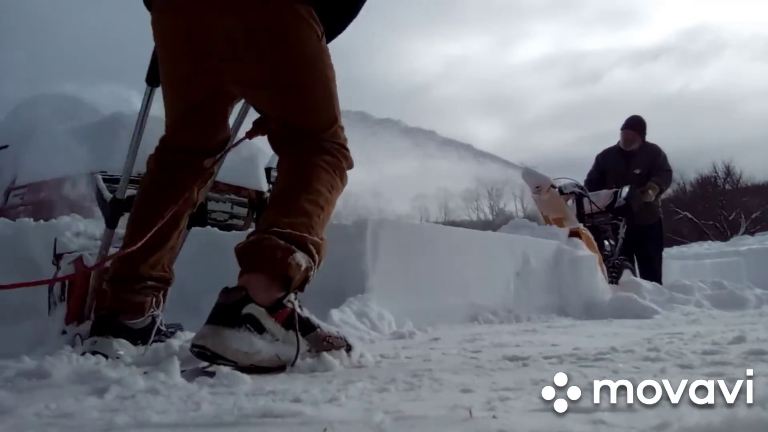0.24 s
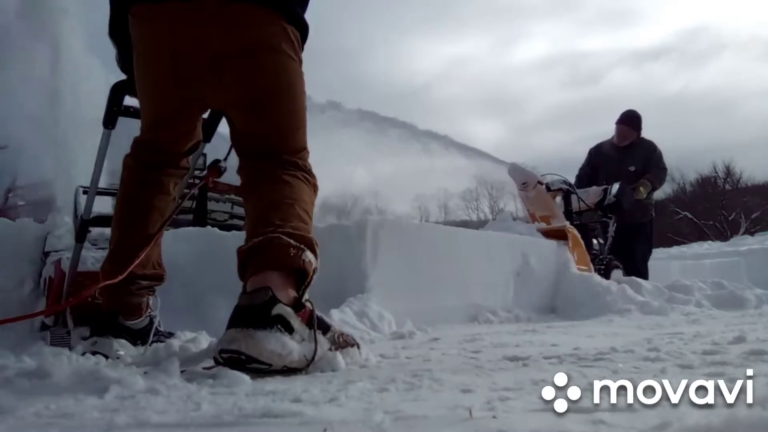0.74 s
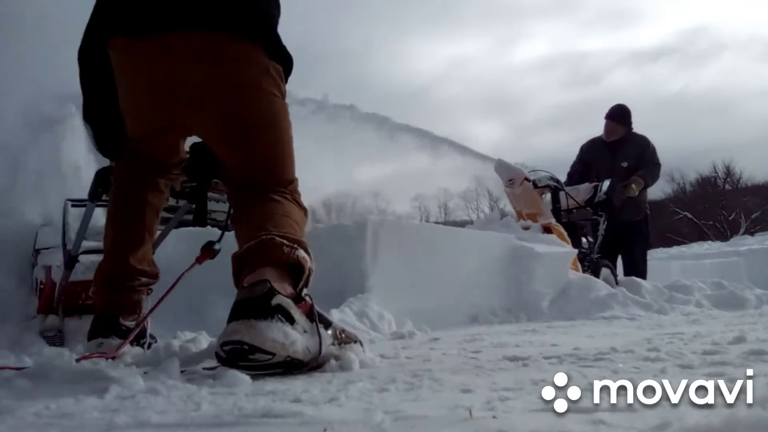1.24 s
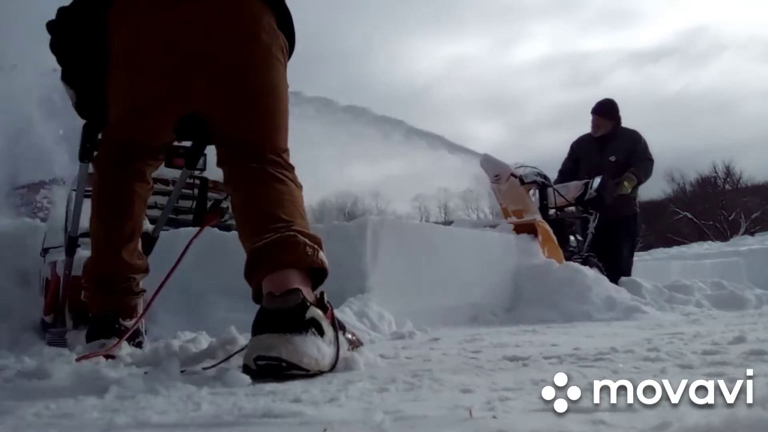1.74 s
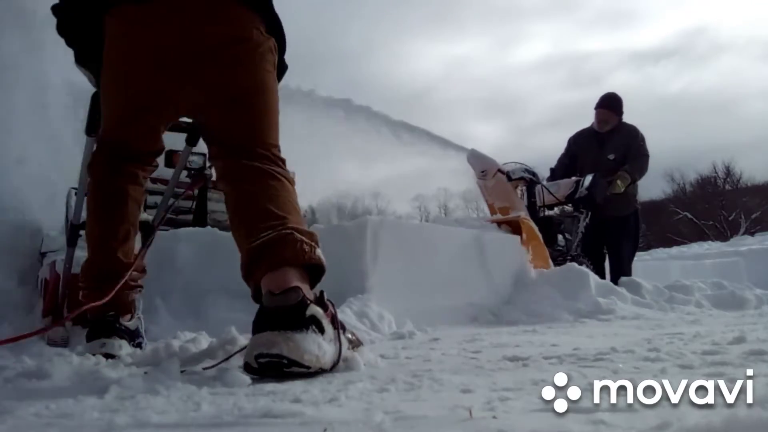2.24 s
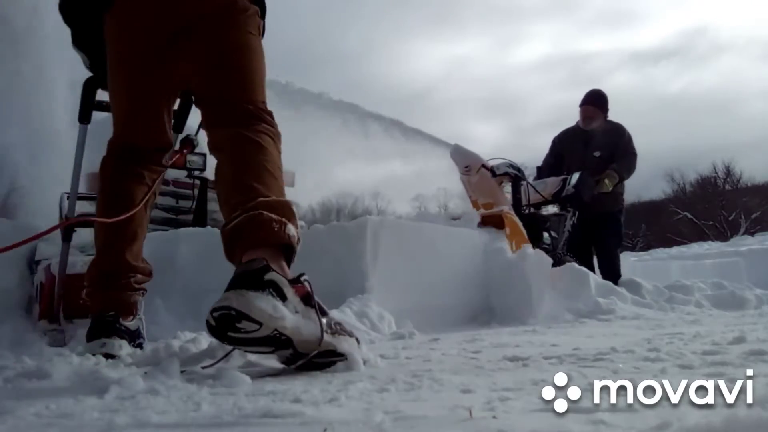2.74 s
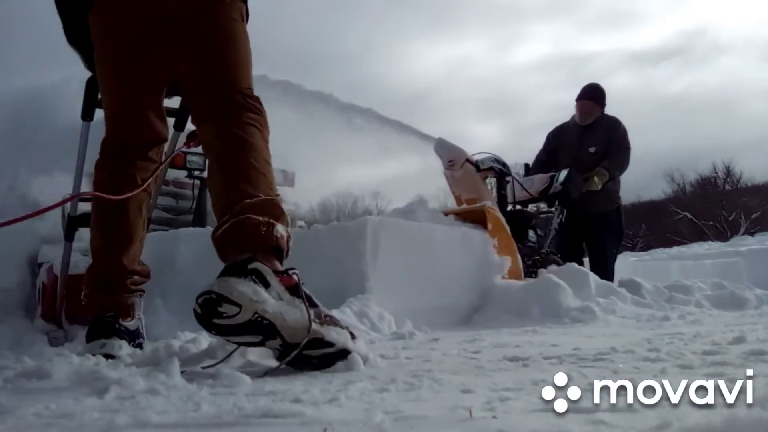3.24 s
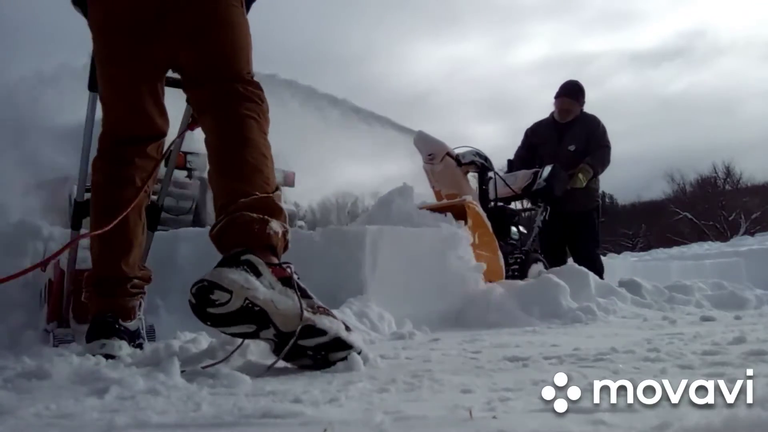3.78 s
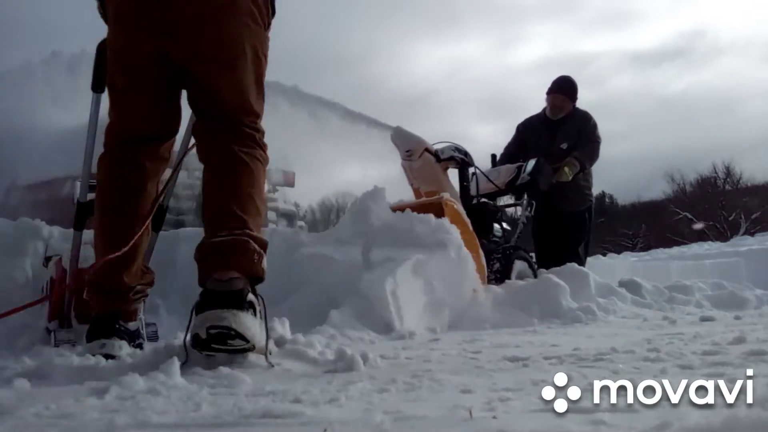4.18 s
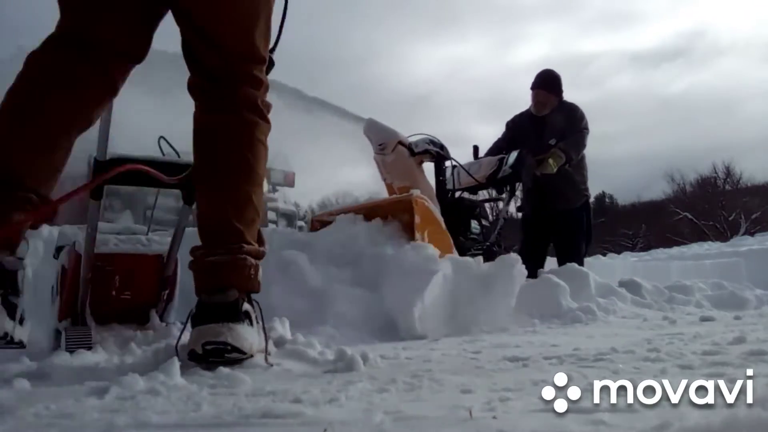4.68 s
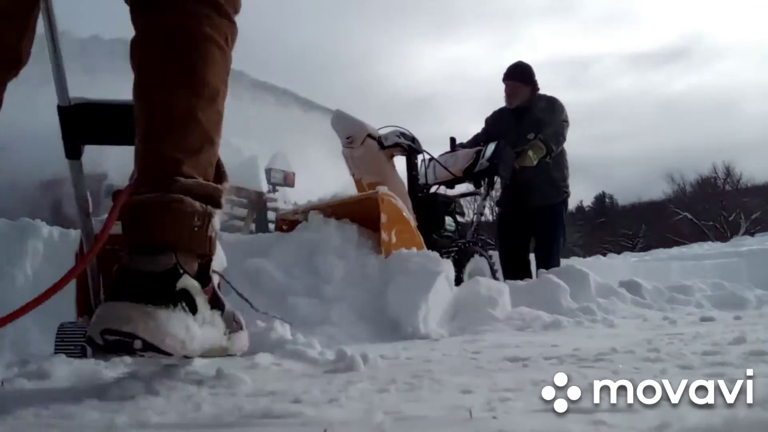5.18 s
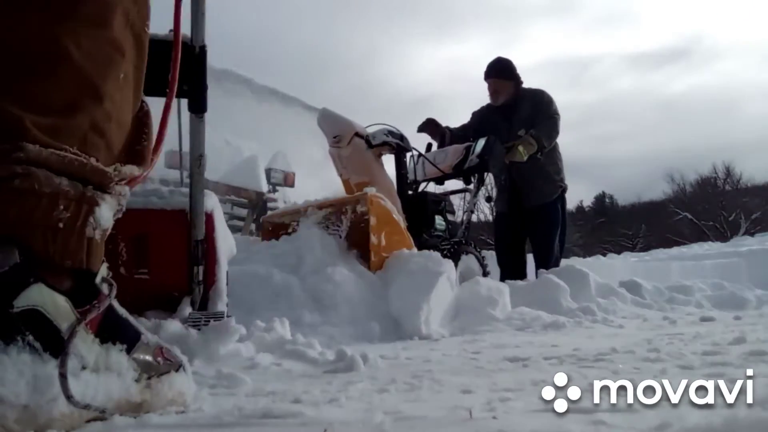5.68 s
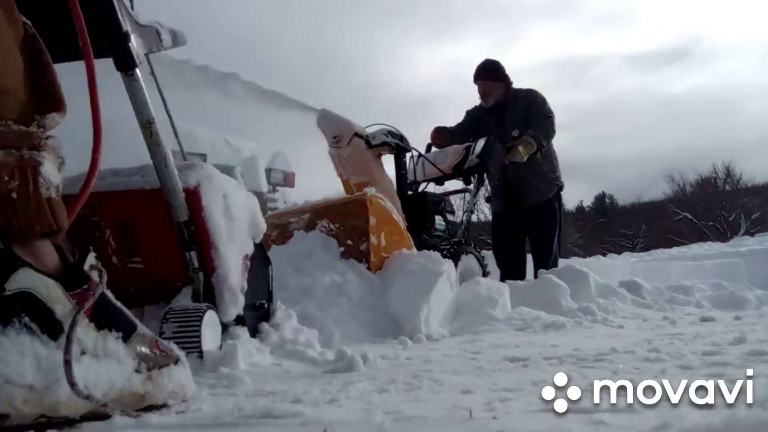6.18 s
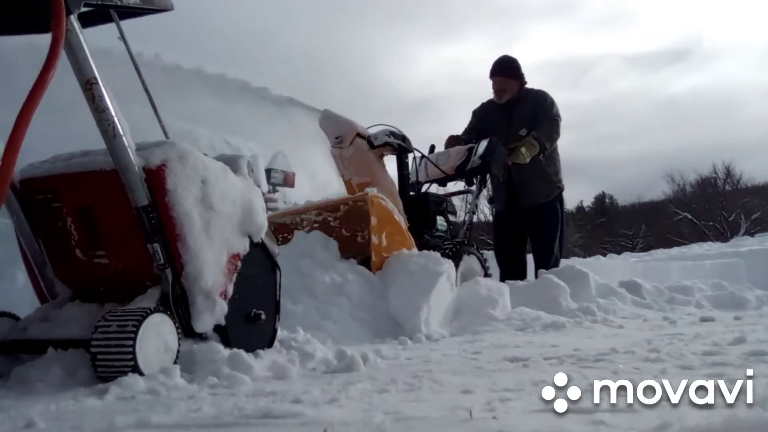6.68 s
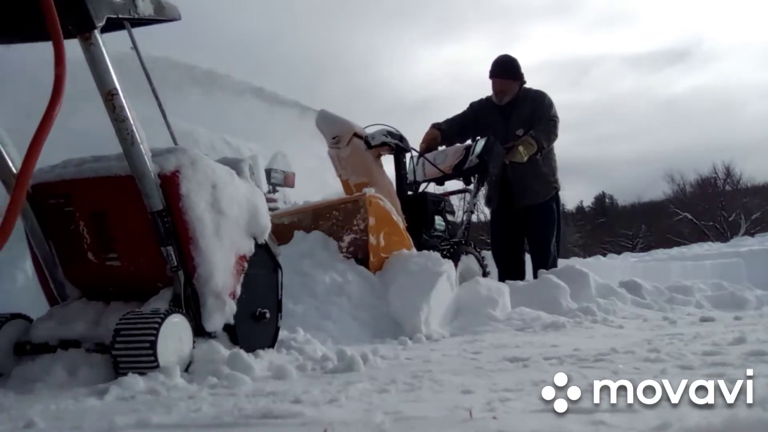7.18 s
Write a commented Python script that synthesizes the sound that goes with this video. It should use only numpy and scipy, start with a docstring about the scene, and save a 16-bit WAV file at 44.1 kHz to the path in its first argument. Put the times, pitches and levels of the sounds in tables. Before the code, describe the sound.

Continuous machine noise in open air: fast booming engine pulses with gritty exhaust rasp, a broad mechanical rush, and a second, quicker paddle thump close to the microphone. Snow rumbles and hisses in irregular bites. The engine grows closer and louder, then its load eases: the thumping blower disappears, the rasp softens, a faint gear whine emerges with the fuller hum, before one last bite of snow.

```python
"""Open air, deep snow: two snowblowers work side by side. A single-cylinder petrol machine creeps closer, each
firing a muffler boom with a rasp of gas; as its load eases it speeds up and hums deeper. Beside the microphone
an electric blower thumps, its paddles slapping snow, until it is pulled back. The petrol machine's augers churn
snow in swelling bites, run empty, then churn again at the end, with powder hissing from the chute."""
import sys
import numpy as np
from scipy import signal
from scipy.fft import rfft, irfft, next_fast_len
from scipy.io import wavfile
from scipy.ndimage import map_coordinates

SR = 44100
rng = np.random.default_rng(int(sys.argv[2]) if len(sys.argv) > 2 else 0)


def master_out(mix):
    """Clip the mix to full scale and print it as 16-bit PCM to the path in sys.argv[1]."""
    frames = np.transpose(np.atleast_2d(mix))
    ceiling = np.clip(frames, -1, 1)
    pcm = np.round(ceiling * 32767).astype(np.int16)
    wavfile.write(sys.argv[1], SR, pcm)


N = 327222
T = np.arange(N) / SR  # s

# petrol engine speed: start_s, firings_per_s
FIRING_RATES = [(0.0, 26.435), (1.0, 26.405), (2.0, 26.392), (3.0, 26.443), (4.0, 26.462), (4.6, 26.623),
                (5.1, 26.605), (5.4, 26.811), (5.65, 27.457), (5.9, 28.231), (6.1, 27.961), (6.3, 27.723),
                (6.6, 28.154), (6.9, 28.645), (7.15, 28.632), (7.42, 28.452)]


def from_db(db):
    """Decibels to amplitude gain."""
    return 10 ** (np.asarray(db) / 20)


def rms_one(x):
    """Scale to unit power."""
    return x / np.sqrt(np.mean(x ** 2) + 1e-20)


def in_time(rows):
    """Interpolate each column of a time curve at every sample."""
    s, *columns = np.transpose(rows)
    return [np.interp(T, s, column) for column in columns]


def ramp(x, start, length):
    """0 before the start, rising linearly to 1 over the length."""
    return np.clip((x - start) / length, 0, 1)


def noise(spectrum):
    """Unit-power noise shaped in frequency, rolled off below the first point."""
    hz, db = np.transpose(spectrum)
    size = next_fast_len(N)
    f = np.maximum(np.arange(size // 2 + 1) * SR / size, 1)
    gain = from_db(np.interp(np.log(f), np.log(hz), db))
    gain = gain * np.minimum(f / hz[0], 1) ** 2
    white = rng.standard_normal(size)
    return rms_one(irfft(rfft(white) * gain, size)[:N])


def narrow_noise(hz, width_hz):
    """Unit-power noise in one narrow resonance, 3 dB down at half a width either side."""
    return noise([
        (hz - 2 * width_hz, -40), (hz - width_hz / 2, -3), (hz, 0),
        (hz + width_hz / 2, -3), (hz + 2 * width_hz, -40), (SR / 2, -80),
    ])


def each_cycle(turns):
    """Random value held per cycle, gliding to the next in the last tenth."""
    values = rng.standard_normal(size=1024)
    whole = np.floor(turns)
    glide = np.clip((turns - whole - .9) * 10, 0, 1)
    return np.interp(whole + glide + 2, np.arange(len(values)), values)


def ringing(orders, turns, late_cycles=0, late_multiple=15):
    """One blow per cycle rings a body: a unit-power waveform with set levels of the rate's multiples."""
    size = 2048  # samples per cycle
    multiple, db = np.transpose(orders)
    k = np.arange(size // 2 + 1)
    level = np.interp(k, multiple, db)
    level = level - 40 * np.log10(np.maximum(k / multiple[-1], 1))
    level[0] = -50
    # minimum phase: the blow comes first, the ring follows
    cepstrum = irfft(np.log(from_db(level)))
    causal = 2 * cepstrum * (np.arange(size) < size // 2)
    lines = np.exp(rfft(causal)) * (k > 0)
    # multiples around late_multiple ring later
    delay_cycles = late_cycles * np.exp(-((k - late_multiple) / 3) ** 2)
    lines = lines * np.exp(-2j * np.pi * np.cumsum(delay_cycles))
    cycle = rms_one(irfft(lines))
    return np.interp(turns % 1 * size, np.arange(size), cycle, period=size)


def reflected(x, lag_ms, strength):
    """Direct sound plus one close reflection; the sum is comb-filtered."""
    late_sample = np.maximum(np.arange(N) - SR * lag_ms / 1000, 0)
    return x + strength * map_coordinates(x, [late_sample], order=3)


def nearness():
    """How near the petrol machine is, 0-1."""
    # approach, easing back slightly at the end: start_s, nearness_0_1
    approach = [(0, 0.06), (1.7, 0.18), (2.7, 0.39), (3.6, 0.54), (4.4, 0.64), (5, 0.75), (5.55, 1),
                (7.42, 0.92)]
    return in_time(approach)[0]


def throttle(wide_open_rate=26.8, closing_span=1.83):
    """Governor closes the throttle as firings per s rise; 1 is wide open."""
    return 1 - ramp(in_time(FIRING_RATES)[0], wide_open_rate, closing_span)


def load(throttle_power=2.04):
    """Engine load, 0-1, falling with a power of the throttle."""
    return throttle() ** throttle_power


def level_db(effort, far_db, near_db, free_db):
    """Engine layer level: far and loaded, plus the changes up close and running free."""
    return far_db + near_db * nearness() + free_db * (1 - effort)


def bites_db():
    """Augers bite into thicker snow: raised-cosine swells."""
    # bites: middle_s, length_s, swell_db
    bites = [(0.272, 1.1, 3), (1.15, .45, 2.5), (1.87, 0.33, 3.5), (3.25, 0.67, 3.5), (3.934, 1.34, 3),
             (5.65, 0.98, 0.5), (7.334, 0.44, 6.5)]
    total_db = 0
    for middle_s, length_s, swell_db in bites:
        phase = np.pi * np.clip((T - middle_s) / length_s, -.5, .5)
        total_db = total_db + swell_db * np.cos(phase) ** 2
    return total_db


def spray(base_db=-47, near_db=-1.5):
    """Powder hisses out of the chute as shaped noise, louder with each bite."""
    # chute hiss spectrum: frequency_hz, density_db_per_hz
    spray_spectrum = [(1500, -25), (3000, -23), (3800, -1.5), (5200, 3.5), (6900, 2.5), (7800, -11),
                      (9000, -21.5), (12300, -25), (13500, -28), (16000, -29)]
    return from_db(base_db + near_db * nearness() + bites_db()) * noise(spray_spectrum)


def churn(base_db=-30, near_db=-3, empty_db=-12, lumps_per_s=30, lumpy_db=0.9):
    """Snow rumbles through the augers in lumps, louder at each bite, hushed while they run empty."""
    # auger rumble spectrum: frequency_hz, density_db_per_hz
    snow_spectrum = [(50, -31), (90, -37), (150, -10.5), (240, 1), (330, -2.5), (430, -8.5), (560, -16),
                     (900, -36), (1600, -56), (4000, -50)]
    emptying = ramp(T, start=5.43, length=1.5)  # s
    refilling = ramp(T, start=6.74, length=0.35)  # s
    churn_db = base_db + near_db * nearness() + bites_db() + empty_db * (emptying - refilling)
    lumps_db = lumpy_db * each_cycle(lumps_per_s * T)
    return from_db(churn_db + lumps_db) * noise(snow_spectrum)


def electric_blower(base_db=-27.5, pulled_back_s=5.6, fade_db_per_s=60, uneven_db=1.5):
    """Each paddle slaps a different lump of snow through the housing: a ring of uneven strength per stroke."""
    # paddle speed: start_s, strokes_per_s
    stroke_rates = [(0.0, 47.58), (3.9, 47.58), (4.3, 47.91), (5.2, 47.98)]
    # paddle thump: multiple_of_stroke_rate, level_db
    thump_orders = [(1, -10), (2, -4), (3, 0), (4, -3), (5, -17), (6, -7), (7, -9), (8, -16), (9, -19),
                    (10, -32), (14, -38)]
    turns = np.cumsum(in_time(stroke_rates)[0]) / SR - .34
    thump_db = base_db - fade_db_per_s * np.maximum(T - pulled_back_s, 0)
    return from_db(thump_db + uneven_db * each_cycle(turns)) * ringing(thump_orders, turns)


def machinery(turns, throb_db=2.0, bite_share=0.81, teeth_per_cycle=48):
    """Fan, belts and gears: a throbbing rush, a whine of meshing teeth and thin ringing metal."""
    # rush spectrum: frequency_hz, density_db_per_hz
    rush_spectrum = [(40, -23.5), (120, 8), (400, 0.5), (620, -0.5), (760, -2), (860, 2), (1050, -3),
                     (1400, -6.5), (1800, -11.5), (2500, -19), (3100, -15), (4000, -24), (8000, -59)]
    # metallic singing: pitch_hz, width_hz, running_free_db, change_under_load_db
    singing_modes = [(3060, 150, -69, 6), (6920, 110, -62, -12)]
    effort = load()
    rush_db = level_db(effort, far_db=-33, near_db=-3.5, free_db=1.1) + bite_share * bites_db()
    rush = from_db(rush_db + throb_db * np.cos(2 * np.pi * turns)) * noise(rush_spectrum)
    # tooth phase (rad) and level (dB) vary from cycle to cycle
    teeth = np.sqrt(2) * np.sin(2 * np.pi * teeth_per_cycle * turns + 0.89 * each_cycle(turns))
    whine_db = level_db(effort, far_db=-76, near_db=3, free_db=24.5) + 1.9 * each_cycle(turns)
    whine = from_db(whine_db) * teeth
    singing = 0
    for pitch_hz, width_hz, free_db, load_db in singing_modes:
        singing = singing + from_db(free_db + load_db * effort) * narrow_noise(pitch_hz, width_hz)
    return rush + whine + singing


def exhaust_gas(turns, rasp_depth=0.99, free_depth=0.5, uneven_db=1.5, eddies_per_s=700, eddy_db=3.0):
    """Gas tears out as the valve opens: a rasp from the can and a sharp hiss at the outlet."""
    # flow after the exhaust valve opens: share_of_cycle, flow_db
    blowdown = [(0, -7.5), (.055, 7.5), (.1, 5.5), (.16, -5), (.24, -4), (.33, -12), (.72, -27.5),
                (.85, -18), (.93, -28), (1, 1.5)]
    # can rasp spectrum: frequency_hz, density_db_per_hz
    rasp_spectrum = [(70, 11.5), (150, 13), (300, -14.5), (550, -2), (750, 0.5), (880, -0.5), (1100, -8.5),
                     (1400, -5), (2000, -6.5), (2600, -8), (3050, -5.5), (3600, -10.5), (4500, -7),
                     (8000, -18), (13000, -25.5)]
    # outlet hiss spectrum: frequency_hz, density_db_per_hz
    hiss_spectrum = [(1500, -18), (3000, -19), (4500, -6), (6000, 3.5), (7000, 7), (7800, -1.5),
                     (9000, -9.5), (11000, -23), (13500, -20.5), (15400, -5), (16000, -6.5)]
    effort = load()
    rasp_db = level_db(throttle(), far_db=-41.5, near_db=11, free_db=-11)
    # up close the outlet points past the microphone
    off_axis_db = -6.5 * ramp(nearness(), start=0.58, length=0.7 - 0.58)
    hiss_db = level_db(effort, far_db=-38.5, near_db=5.5, free_db=-8) + off_axis_db
    # puffs soften as the load falls
    flow_db = np.interp(turns % 1, *np.transpose(blowdown))
    flow_db = flow_db * (free_depth + (1 - free_depth) * effort)
    flow_db = flow_db + uneven_db * each_cycle(turns)
    # the jet breaks up into eddies within each puff
    eddies = np.interp(T * eddies_per_s, np.arange(N), rng.standard_normal(N))
    rasp = rms_one(from_db(rasp_depth * flow_db) * noise(rasp_spectrum))
    hiss = rms_one(from_db(flow_db + eddy_db * eddies) * noise(hiss_spectrum))
    return from_db(rasp_db) * rasp + from_db(hiss_db) * hiss


def muffler(turns, uneven_db=0.35, loaded_lag_cycles=0.019, free_lag_cycles=0.013, bark_hz=185, free_ring_db=-3):
    """Each firing rings muffler and shroud; loaded and free tones crossfade as the load comes off."""
    # muffler tone under load: multiple_of_firing_rate, level_db
    loaded_orders = [(1, -31.5), (2, -11.5), (3, -9.5), (4, -10.5), (5, 0), (6, -2), (7, -11.5), (8, -9.5),
                     (9, -7.5), (10, -13), (11, -12.5), (12, -12.5), (13, -20.5), (14, -13), (15, -6.5),
                     (16, -13.5), (17, -12), (18, -16.5), (19, -31), (20, -16.5), (21, -23.5), (22, -26)]
    # muffler tone running free: multiple_of_firing_rate, level_db
    free_orders = [(1, -34), (2, -12.5), (3, -15), (4, -3), (5, 4.5), (6, 0), (7, -14.5), (8, -6), (9, -7),
                   (10, -15.5), (11, -28), (12, -9.5), (13, -10.5), (14, -20), (15, -13), (16, -15.5),
                   (17, -21.5), (18, -14), (19, -15.5), (20, -20.5), (21, -22.5), (22, -17.5)]
    # upper ring of the engine shroud: frequency_hz, level_db
    shroud = [(660, -29.5), (770, -38.5), (830, -31), (880, -19), (900, -25.5), (925, -19.5), (955, -27.5),
              (1010, -33), (1060, -26), (1170, -31), (1400, -33), (1650, -50)]
    effort = load()
    # shroud pitches placed for the first (loaded) and last (free) firing rates
    first_rate, last_rate = FIRING_RATES[0][1], FIRING_RATES[-1][1]
    loaded_ring = [(hz / first_rate, db) for hz, db in shroud]
    free_ring = [(hz / last_rate, db + free_ring_db) for hz, db in shroud]
    loaded = ringing(list(loaded_orders) + loaded_ring, turns - loaded_lag_cycles, late_cycles=0.554)
    free = ringing(list(free_orders) + free_ring, turns - free_lag_cycles)
    boom_db = level_db(effort, far_db=-23, near_db=4, free_db=2) + uneven_db * each_cycle(turns)
    boom = from_db(boom_db) * (effort * loaded + (1 - effort) * free)
    # the upper multiples make the bark
    upper = signal.sosfiltfilt(signal.butter(2, bark_hz, "high", fs=SR, output="sos"), boom)
    bark_db = level_db(effort, far_db=-1.6, near_db=-1.1, free_db=.5)
    return boom + (from_db(bark_db) - 1) * upper


def scene(echo=0.48, far_lag_ms=0.19, near_lag_ms=0.045):
    """Both machines in open air; the petrol machine's hiss also bounces off the packed snow."""
    turns = np.cumsum(in_time(FIRING_RATES)[0]) / SR + .02
    hiss = exhaust_gas(turns) + machinery(turns) + spray()
    lag_ms = far_lag_ms + (near_lag_ms - far_lag_ms) * nearness()
    petrol = muffler(turns) + reflected(hiss, lag_ms, echo) / np.sqrt(2)
    return (petrol + electric_blower() + churn())[None]


def record(dry, low_cut_hz=34, ceiling=.42, cutoff_hz=15800):
    """Cut the deepest rumble, round the tallest peaks, cut the top of the treble."""
    low_cut = signal.butter(4, low_cut_hz, "high", fs=SR, output="sos")
    heard = signal.sosfiltfilt(low_cut, dry)
    rounded = heard / (1 + (heard / ceiling) ** 4) ** (1 / 4)
    treble_cut = signal.ellip(10, .2, 80, cutoff_hz, fs=SR, output="sos")
    return signal.sosfilt(treble_cut, rounded)


dry = scene()
out = record(dry)
master_out(out)
```